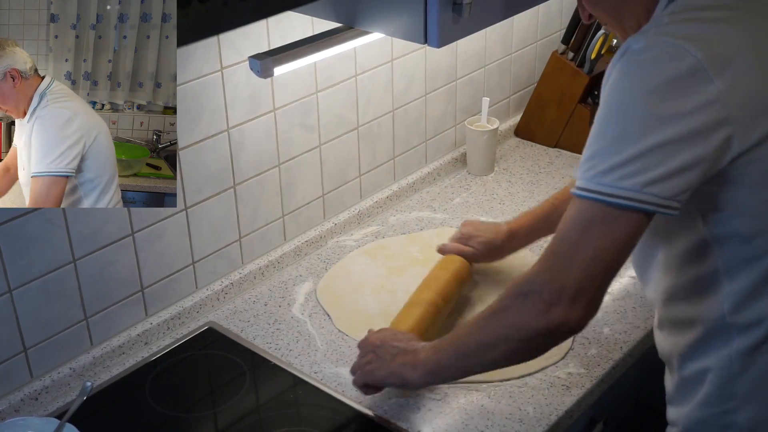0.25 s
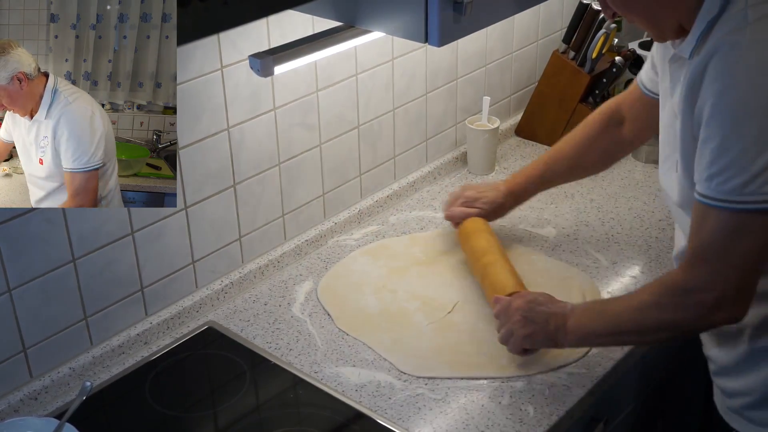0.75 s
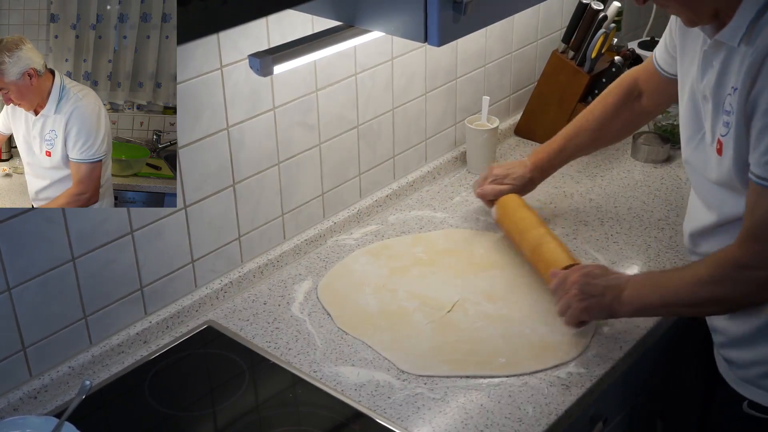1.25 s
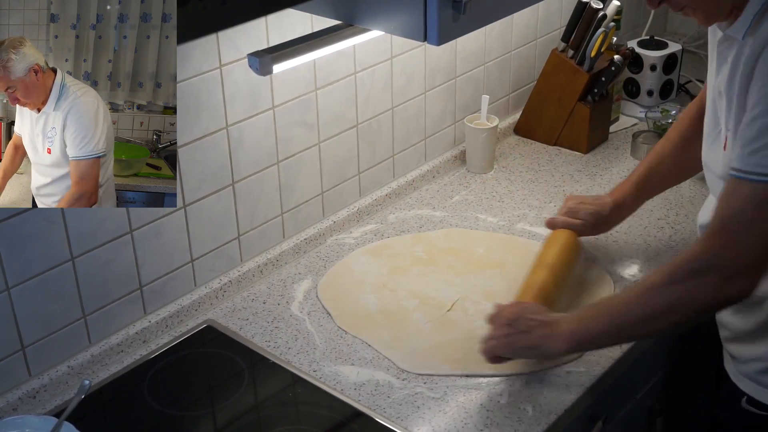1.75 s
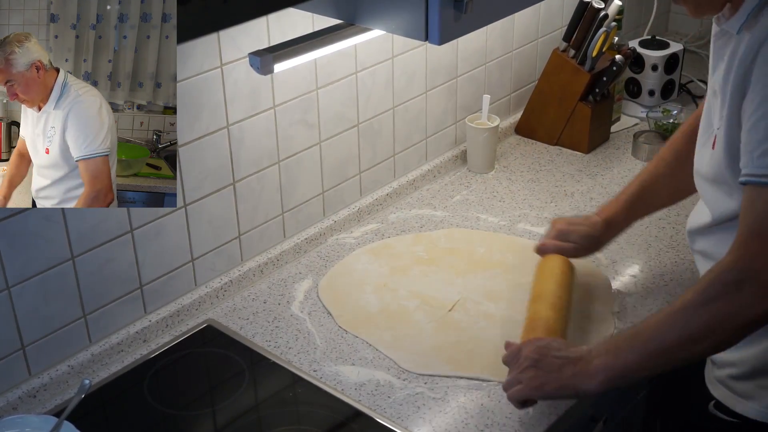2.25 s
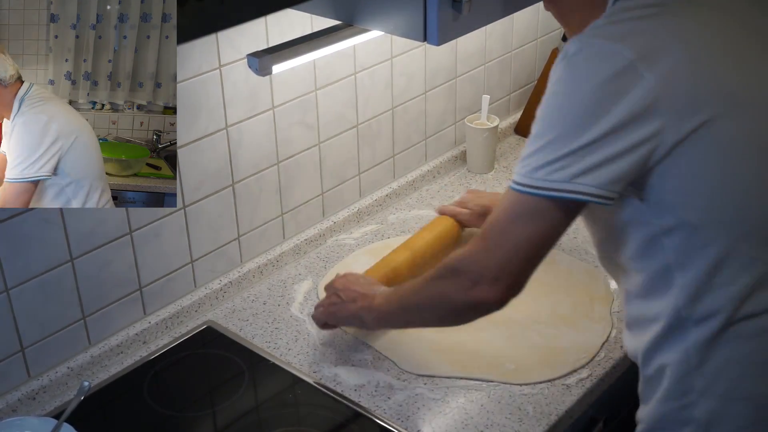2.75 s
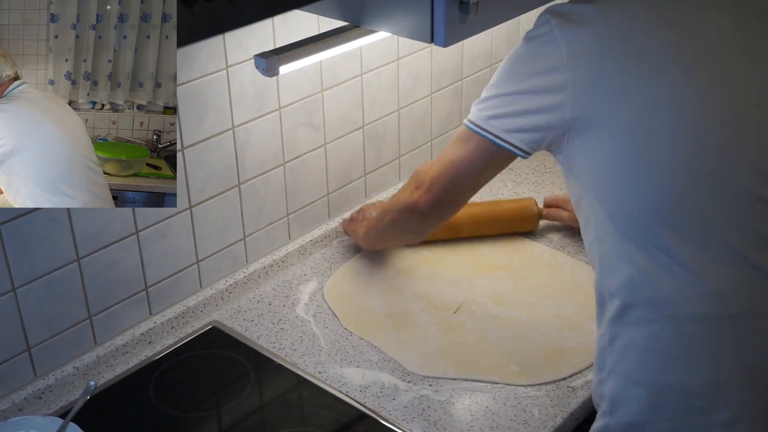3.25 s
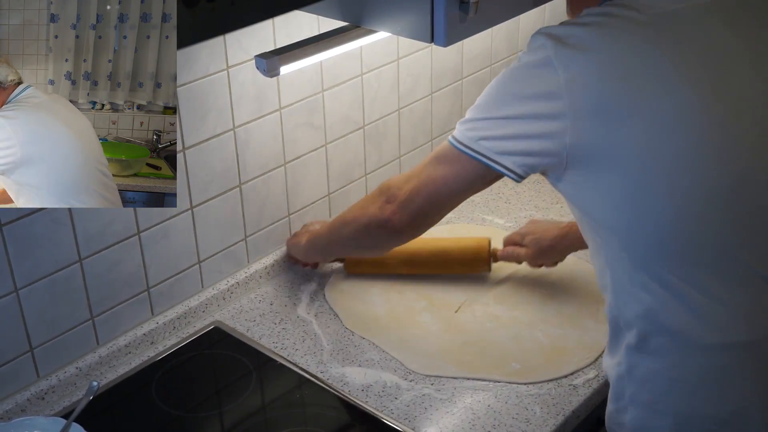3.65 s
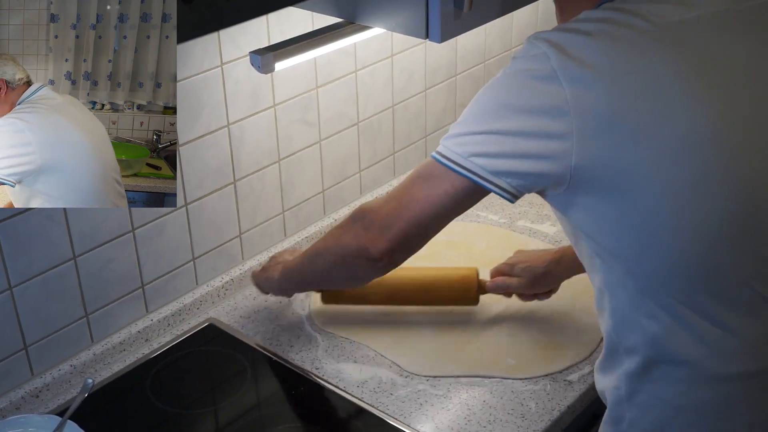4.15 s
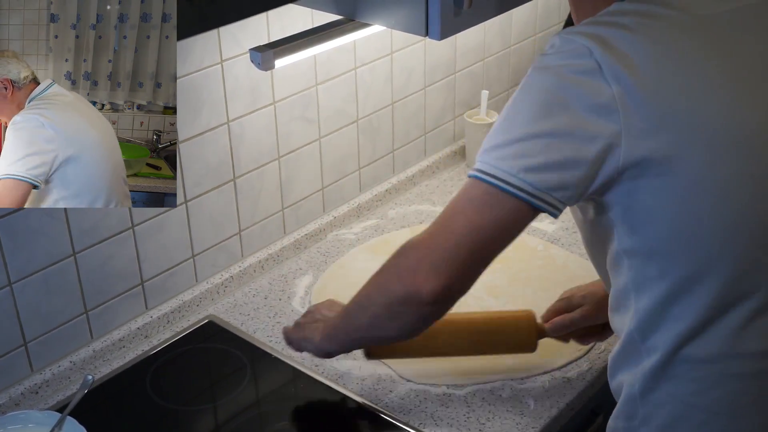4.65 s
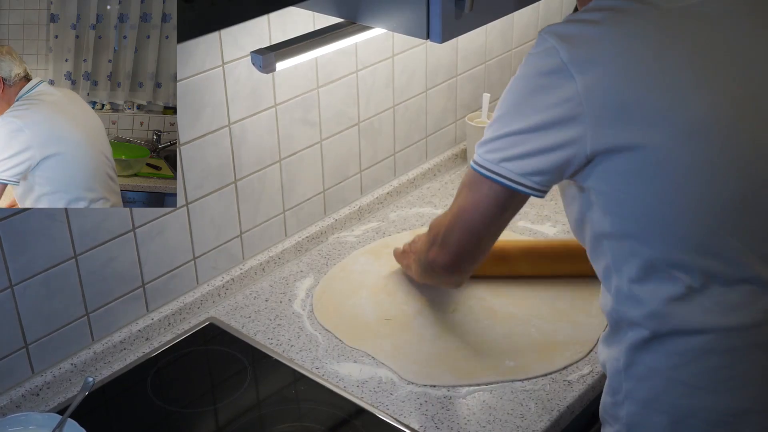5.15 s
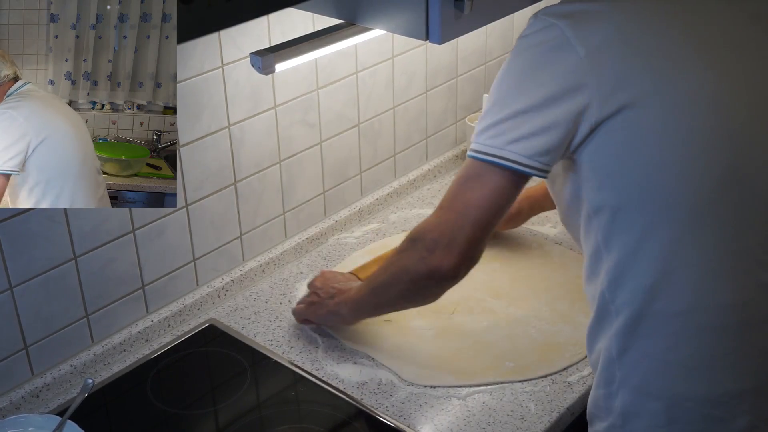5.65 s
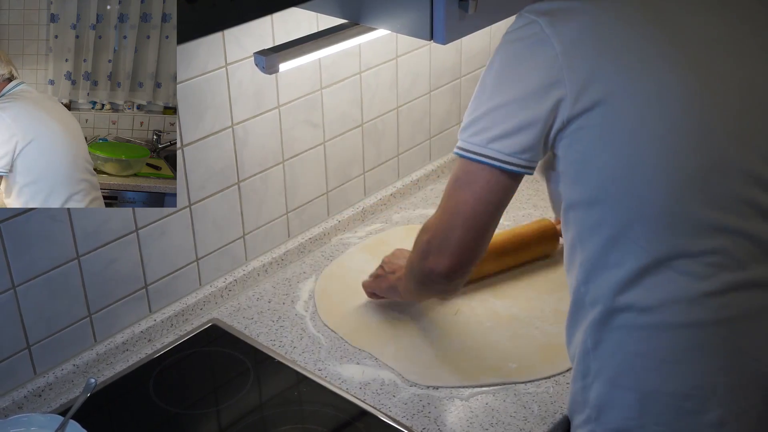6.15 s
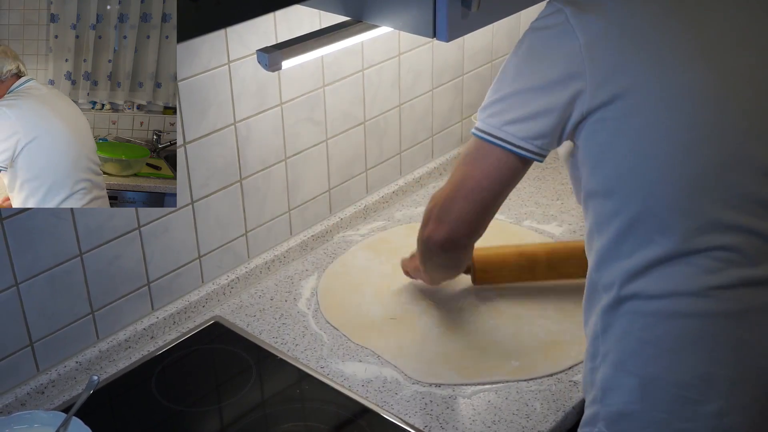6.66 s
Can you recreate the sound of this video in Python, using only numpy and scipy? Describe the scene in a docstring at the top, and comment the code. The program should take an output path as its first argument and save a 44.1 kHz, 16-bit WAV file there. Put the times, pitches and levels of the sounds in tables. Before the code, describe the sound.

A wooden rolling pin hisses over floured dough in uneven strokes, with counter thuds and loose barrel clacks echoing in a tiled kitchen over faint fan hum.

```python
"""A wooden rolling pin is pushed back and forth over thin dough on a floured kitchen counter.
The turning pin is shaped noise that hisses over the flour, swelling and fading with each stroke.
Most strokes start with a thud of the counter and a clack of the barrel on its axle, both made of
ringing resonances, as are the knocks at the hob and the cracks of flour. A tiled kitchen answers
with echoes of decaying noise, over the steady noise and wavering tones of an appliance."""
import sys
import numpy as np
from scipy import signal
from scipy.fft import rfft, irfft, next_fast_len
from scipy.io import wavfile
from scipy.ndimage import uniform_filter1d, map_coordinates

SR = 44100
rng = np.random.default_rng(int(sys.argv[2]) if len(sys.argv) > 2 else 0)


def dump_mix(stems):
    """Bounce the given channels to the path in sys.argv[1] as a 16-bit WAV at rate SR."""
    frames = np.atleast_2d(stems).T  # one column per channel
    limited = np.clip(frames, -1, 1)  # hard clip at full scale
    pcm = np.round(limited * 32767).astype(np.int16)
    wavfile.write(sys.argv[1], SR, pcm)


N = 304731
HIT = 24576  # samples in the ring of one blow
HIT_HZ = np.fft.rfftfreq(HIT, 1 / SR)
HIT_T = np.arange(HIT) / SR


def rolling():
    """Countless flour grains rub under the turning pin: a bright hiss over a duller, uneven rub."""
    # relative spectrum of the flour: pitch_hz, level_db per Hz
    flour = [(60, -22), (200, 1.5), (500, 4), (900, 0), (1500, 3.5), (2500, 0.5), (4000, -0.5),
             (7000, -2.5), (10000, 0), (12500, 1.5), (15800, -2)]
    coarse_per_s, coarse_size = 500, 2.5  # coarser grains, and their added size over the fine ones
    rub_db, hiss_db = 6.5, 5.5  # mean gains below and above the split
    split_hz = 3500
    coarse = rng.random(N) < coarse_per_s / SR
    grains = diffuse(N) * (1 + coarse_size * coarse)
    friction = unit(filtered(grains, lambda hz: amp(along(flour, hz))))
    low = filtered(friction, lambda hz: 1 / (1 + (hz / split_hz) ** 4))
    high = friction - low
    rub = amp(rub_db + 1.6 * wobble(21.9)) * low
    hiss = amp(hiss_db + 0.47 * wobble(35)) * high
    return stroke_level() * (rub + hiss)


def stroke_level():
    """Strokes reach full speed, slow and die away; the power of lighter brushes is added to theirs."""
    # one push or pull of the pin: start_s, speeding_up_s, slowing_down_s,
    # full_speed_db (ahead of the rub and hiss gains), onset_db (relative to full speed)
    strokes = [(0.0, 0.072, 0.12, -46, 1.5), (0.407, 0.13, 0.14, -44, -2.5), (0.93, 0.11, 0.16, -44.5, -13),
               (1.485, 0.083, 0.21, -46, -4), (1.99, 0.13, 0.15, -46, -6), (3.178, .125, .13, -47.5, -16),
               (3.742, 0.25, 0.093, -46.5, -7), (4.349, 0.18, 0.086, -46.5, -8),
               (5.08, 0.21, 0.21, -48, -7), (5.692, 0.16, 0.11, -45.5, -20),
               (6.257, 0.14, 0.076, -44.5, -10), (6.778, 0.12, .1, -45, -12)]
    # light brushes over the flour as the pin is lifted and set anew:
    # top_s, level_db (ahead of the rub and hiss gains), swell_s, fade_s
    brushes = [(0.23, -53, 0.018, 0.016), (0.3, -57.5, 0.046, .08), (0.69, -49.5, 0.024, 0.03),
               (0.86, -63, 0.11, 0.084), (1.225, -60, .012, 0.019), (2.3, -56, 0.016, .022),
               (2.52, -59, .01, 0.022), (2.74, -53, 0.023, .035), (2.84, -58, 0.056, 0.17),
               (2.935, -56, .01, 0.02), (3.09, -60.5, 0.044, 0.094), (4.63, -57, .014, .04),
               (5.55, -61, .04, 0.056)]
    slowing_loss_db, release_db_per_s = 13, 78  # lost while the pin slows, then the dying away
    t = np.arange(N) / SR
    power = np.zeros(N)
    for s, rise, fall, db, onset_db in strokes:
        start = max(round(s * SR), 0)
        past_top = t[start:] - s - rise
        speeding_db = onset_db * np.minimum(past_top / rise, 0) ** 2
        slowing_db = slowing_loss_db * np.clip(past_top / fall, 0, 1) ** 2
        release_db = release_db_per_s * np.maximum(past_top - fall, 0)
        power[start:] += amp(db + speeding_db - slowing_db - release_db) ** 2
    for s, db, swell, fade in brushes:
        power += amp(db) ** 2 * np.exp(-((t - s) / np.where(t < s, swell, fade)) ** 2)
    return np.sqrt(power)


def thuds():
    """Dough cushions the counter, so mainly its low modes sound; the hollow cabinet booms just after."""
    # thuds of the counter; the first is the dying end of an earlier one:
    # start_s, level_db (11 dB over the rms of the first 50 ms),
    # boom_db and hardness_db (weighted by the cushion), cabinet_hz, cabinet_db (relative to counter)
    counter_thuds = [(0.001, -32.5, -18, -10.5, 355, -5), (0.408, -29, -17.5, -17.5, 357, -1.5),
                     (0.929, -19, -23, -8, 361, 0), (1.155, -31.5, -17.5, -13, 362, -4),
                     (1.498, -22, -13.5, -9.5, 354, -3), (1.994, -25.5, -16.5, -8, 360, -3),
                     (3.173, -24, -9, -12, 360, 0.5), (3.742, -41, -37, 5, 363, -4),
                     (4.347, -20, -14, -10, 374, -0.5), (5.078, -36, -12, -1, 373, -5),
                     (5.716, -26.5, -13.5, -10.5, 378, -2.5), (6.255, -15.5, -21, -7, 377.4, -0.5),
                     (6.775, -20.5, -17.5, -11.5, 367, 1.5)]
    # how the dough passes a blow on: pitch_hz, level_db, boom_share, hardness_share
    dough = [(40, -3, 0.34, 0), (85, -2.5, 0.46, 0.077), (130, 10.5, 1, 0), (236, 10.5, 0.92, 0.045),
             (338, -4, 0, 0), (423, -4.5, 0.02, 0), (566, 7.5, 0.029, 1), (890, 5, 0, 1), (2000, -4, 0, 0),
             (6000, -41, 0, 0)]
    # modes of the counter: pitch_hz, width_hz, level_db
    counter = [(132, 24, -10.5), (156, 10.4, -2.5), (196, 12.7, -1), (239.3, 10, -2.5), (291, 15, -1),
               (367, 50, -3.5), (390, 79, -7), (469, 55, -8), (583, 41, -8), (620, 21, -14),
               (790, 190, -22.5)]
    cabinet_width_hz, cabinet_lag_s = 47, 0.01097  # the hollow under the counter answers late
    out = np.zeros((2, N))
    for s, db, boom_db, hard_db, cabinet_hz, cabinet_db in counter_thuds:
        cushion = [(hz, level + boom * boom_db + hard * hard_db) for hz, level, boom, hard in dough]
        ring = struck(resonances(counter, HIT_HZ) * amp(along(cushion, HIT_HZ)))
        hollow = struck(resonances([(cabinet_hz, cabinet_width_hz, 0)], HIT_HZ) ** 2)
        add(out, s, db - 11.0, kitchen(ring, early_db=9, early_t60=0.16, tail_db=10.5))
        boom = kitchen(hollow, early_db=-10.5, early_t60=0.026, tail_db=-5)
        add(out, s + cabinet_lag_s, db + cabinet_db - 11.0, boom)
    return out


def clacks():
    """Wood on wood: the loose barrel strikes its axle and chatters; one ring shifts with the grip."""
    # the barrel strikes its axle: start_s, level_db (11 dB over the rms of the first 50 ms), ring_hz,
    # ring_db, wood_db (low modes), hardness_db (these three relative, ahead of fixed offsets),
    # chatter (scales the bounces, relative to the first contact), snap_db (rms of its first 50 ms)
    strikes = [(0.413, -37.5, 3400, -22, -7, -22, 0.92, -55),
               (0.9318, -12, 3136, -5.5, -8.5, -20.5, 0.24, -37), (1.5, -29, 3130, -28, -2, -34, 0.36, -55),
               (1.992, -23.5, 2360, -9, -12, -29, 0.14, -59), (2.508, -46, 3080, -20, -10, -15, 0.37, -70),
               (3.1796, -10.5, 3050, -8, -10.5, -18.5, 0.27, -39),
               (3.7455, -26.5, 3180, -7, -9.5, -21, 0.5, -50), (4.36, -34.5, 3010, -26, -4, -26, 0.65, -65),
               (5.0819, -18, 3400, -13, -9.5, -13.5, 0.65, -36.5),
               (5.385, -24.5, 3395, 2.5, -6, -15.5, 0.96, -54),
               (5.694, -14, 3470, -7.5, -16.5, -19.5, 0.17, -61),
               (6.262, -18.5, 2540, -3.5, -7.5, -10, 0.37, -50),
               (6.7805, -37.5, 2900, -5, -17, -26, 0.3, -65)]
    # modes of the barrel: pitch_hz, width_hz, level_db (mean over the blows)
    barrel = [(694, 170, -6.5), (1168, 92, 1), (1320, 110, -6.5), (1770, 160, -1), (1927, 100, -1.5),
              (2120, 66, -19), (2225, 170, -1), (2365, 116, 3), (2620, 83, -5.5), (3060, 140, 1),
              (3130, 79, -2.5), (3404, 300, -4), (3770, 170, -26), (4840, 420, -11), (6290, 540, -6),
              (7550, 1100, -19)]
    out = np.zeros((2, N))
    for s, db, ring_hz, ring_db, wood_db, hard_db, chatter, snap_db in strikes:
        gripped = [(hz, width, level + 2 * rng.normal()) for hz, width, level in barrel]
        body = resonances(gripped + [(ring_hz, 85, ring_db + 13.5)], HIT_HZ)
        contact = [(200, -17), (900, wood_db + 6.5), (1700, wood_db + 12), (2400, -2.5), (3500, 1.0),
                   (4200, hard_db + 14.5), (6500, hard_db + 12), (15000, hard_db + 15.0)]  # (Hz, dB)
        ring = struck(body * amp(along(contact, HIT_HZ)))
        bounces_s = np.cumsum(rng.uniform(.001, .005, size=5))
        rattle = ring.copy()
        for k, lag in enumerate(bounces_s):
            rattle += chatter * 0.83 ** k * np.roll(ring, round(lag * SR))
        add(out, s, db - 11.0, kitchen(rattle, early_db=6.0, early_t60=0.11, tail_db=2.5))
        # a faint, dry copy of the ring 3 ms ahead softens the onset
        add(out, s - .003, db - 33.0, np.array([ring, ring]))
        # a short dry snap of noise, without the kitchen
        snap = filtered(diffuse(HIT), lambda hz: hz / (hz + 3000))
        snap = snap * amp(-60 * HIT_T / 0.11) * (1 - np.exp(-HIT_T / 0.0013))
        add(out, s, snap_db, snap)
    return out


def knocks():
    """A handle bumps the edge of the hob, whose modes give short hollow knocks."""
    # bumps of the handle: start_s, level_db (13.5 dB over the rms of the first 50 ms)
    bumps = [(0.024, -21.5), (3.744, -28), (3.932, -31.5), (4.503, -37)]
    # modes of the hob: pitch_hz, width_hz, level_db
    hob = [(325, 90, -13), (575, 130, 3.5), (751, 50, 7), (1028, 81, 0.5), (1500, 300, -15),
           (2200, 290, -24)]
    contact = [(100, -9), (400, -7.0), (1100, 0.0), (1500, -5.5), (5000, -3.5)]  # (Hz, dB)
    out = np.zeros((2, N))
    ring = struck(resonances(hob, HIT_HZ) * amp(along(contact, HIT_HZ)))
    for s, db in bumps:
        add(out, s, db - 13.5, kitchen(ring, early_db=6, early_t60=0.076, tail_db=0.0))
    return out


def ticks():
    """Flour crumbs crack under the barrel: tiny, high, broadly tuned rings."""
    # cracks of the crumbs: start_s, level_db (10 dB over the rms of the first 50 ms), pitch_hz
    crumbs = [(0.2194, -49, 11800), (0.554, -34, 11800), (0.6894, -44, 9260), (2.3047, -53, 14600),
              (2.5082, -54, 12400), (2.9294, -63, 11200), (3.47, -38, 11300), (5.189, -39.5, 9000)]
    out = np.zeros((2, N))
    for s, db, hz in crumbs:
        ring = struck(resonances([(hz, 5000, 0)], HIT_HZ) ** 2)
        add(out, s, db - 10, kitchen(ring, early_db=5, early_t60=.06, tail_db=1))
    return out


def appliance():
    """Steady fan noise with a few wavering tones and a thin whine, all narrow or broad bands of noise."""
    # relative spectrum of the fan noise: pitch_hz, level_db per Hz
    ambient = [(15, -78), (25, -61), (170, -23), (241, -13), (269, -12), (299, -5), (437, -9), (710, -4.5),
               (791, -4), (2970, -15), (3580, -21), (3990, -21.5), (5520, -26.5), (12700, -28.5),
               (15800, -28.5)]
    # tones and whine: pitch_hz, width_hz, level_db (rms of the part alike at both microphones)
    hum = [(300.5, 6.2, -63), (386.5, 26, -65.5), (651, 21, -64), (1149, 30, -66), (12850, 160, -72.5)]
    air_db = -50.68  # rms
    air = amp(air_db) * unit(filtered(diffuse(N), lambda hz: amp(along(ambient, hz))))

    def tones(hz):
        """Bell-shaped bands, each scaled so that its width leaves its level alone."""
        total = 0
        for centre, width, db in hum:
            bell = np.exp(-np.pi / 2 * ((hz - centre) / width) ** 2)
            total = total + amp(db) * np.sqrt(SR / 2 / width) * bell
        return total

    return air + filtered(diffuse(N), tones)


def kitchen(x, early_db, early_t60, tail_db):
    """Direct sound, quick echoes off counter, tiles and cupboards, and a tail, drawn anew at each call."""
    # decay of the tiled room: pitch_hz, t60_s
    decay = [(120, 0.71), (260, 0.61), (700, 0.47), (1800, 0.5), (3200, 0.49), (6000, 0.47), (14000, 0.37)]
    echoes = diffuse(HIT)
    hz, t, z = signal.stft(echoes, SR, nperseg=256)
    fading = z * amp(-60 * t / along(decay, hz)[:, None])
    tail = signal.istft(fading, SR, nperseg=256)[1][:, :HIT]
    tail *= 1 - np.exp(-HIT_T / 0.006)
    early = echoes[:, ::-1] * amp(-60 * HIT_T / early_t60) * (1 - np.exp(-HIT_T / 0.0016))
    paths = amp(early_db) * early / np.linalg.norm(early[0])
    paths += amp(tail_db) * tail / np.linalg.norm(tail[0])
    paths[:, 0] += 1  # direct sound
    response = rfft(paths)
    # the room ripples the spectrum finely but leaves the broad colour to the struck body
    power = np.mean(np.abs(response) ** 2, axis=0)
    colour = np.sqrt(np.abs(uniform_filter1d(power, size=45)))
    return irfft(rfft(x) * response * rfft(struck(1 / colour)))


def diffuse(size):
    """White stereo noise from all sides: most alike at both microphones in the bass, least in the treble."""
    # spread between the microphones: pitch_hz, side_over_mid_db
    spread = [(30, -10), (100, -23), (250, -18), (500, -12), (1000, -8), (2000, -6), (4000, -1.5),
              (12000, -1)]
    mid, side = rng.standard_normal((2, size))
    side = filtered(side, lambda hz: amp(along(spread, hz)))
    return np.array([mid + side, mid - side])


def resonances(modes, hz):
    """Gain of a body with (Hz, width Hz, dB) modes, their powers summed."""
    power = 0
    for centre, width, db in modes:
        damping = (hz * width) ** 2
        power = power + amp(db) ** 2 * damping / ((centre ** 2 - hz ** 2) ** 2 + damping)
    return np.sqrt(power)


def struck(gain):
    """The causal, minimum-phase ring of a body with this gain."""
    cepstrum = irfft(np.log(np.maximum(gain, 1e-6)))
    cepstrum[1:HIT // 2] *= 2
    cepstrum[HIT // 2 + 1:] = 0
    return irfft(np.exp(rfft(cepstrum)))


def add(out, s, db, sound):
    """Put a sound in at s, with db as the rms level of its first 50 ms."""
    start = max(round(s * SR), 0)
    strength = np.sqrt(np.mean(sound[:, :SR // 20] ** 2))
    out[:, start:start + sound.shape[1]] += (amp(db) / strength * sound)[:, :N - start]


def filtered(x, response):
    """x times a response of frequency."""
    size = x.shape[-1]
    m = next_fast_len(size + 8192)
    return irfft(rfft(x, m) * response(np.fft.rfftfreq(m, 1 / SR)), m)[..., :size]


def wobble(rate):
    """A smooth random curve, rate knots a second."""
    return map_coordinates(rng.standard_normal(int(N * rate / SR) + 4), [np.arange(N) * rate / SR])


def along(points, hz):
    """(Hz, value) points read on a log axis."""
    f, v = np.transpose(points)
    return np.interp(np.log(hz + 1), np.log(f + 1), v)


def unit(x):
    """x at rms 1."""
    return x / np.sqrt(np.mean(x ** 2) + 1e-20)


def amp(db):
    """dB to gain."""
    return 10 ** (np.asarray(db) / 20)


def scene():
    """All sounds of the counter, with the thuds slightly to the right."""
    panned_thuds = thuds() * amp([[-.5], [.5]])  # left and right, dB
    return rolling() + panned_thuds + clacks() + knocks() + ticks() + appliance()


def record(dry):
    """The stereo microphone passes nothing from its band limit upward."""
    top_hz = 15950
    return filtered(dry, lambda hz: hz < top_hz)


dry = scene()
out = record(dry)
dump_mix(out)
```